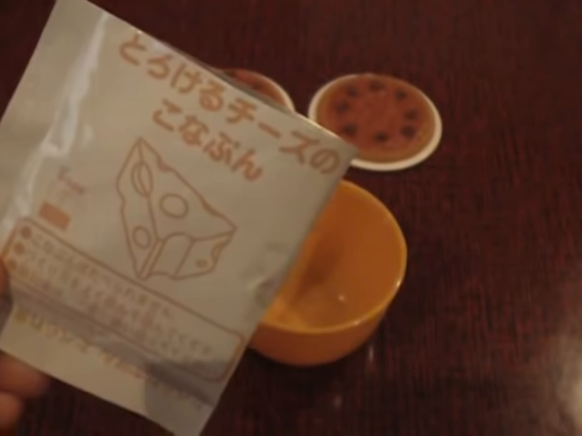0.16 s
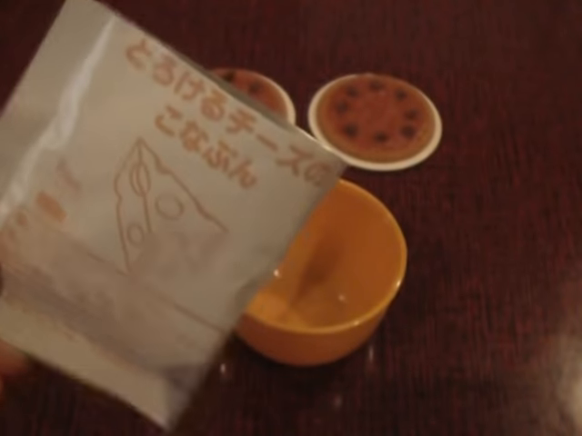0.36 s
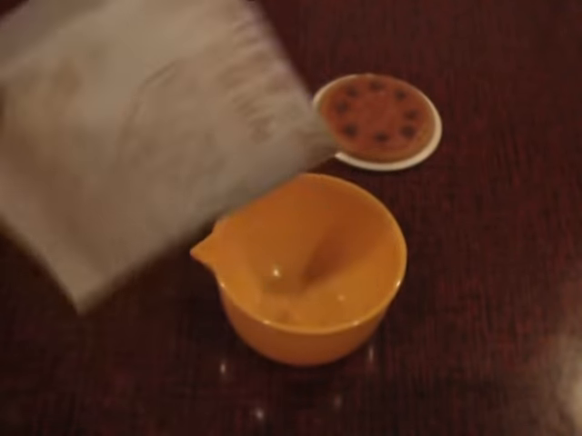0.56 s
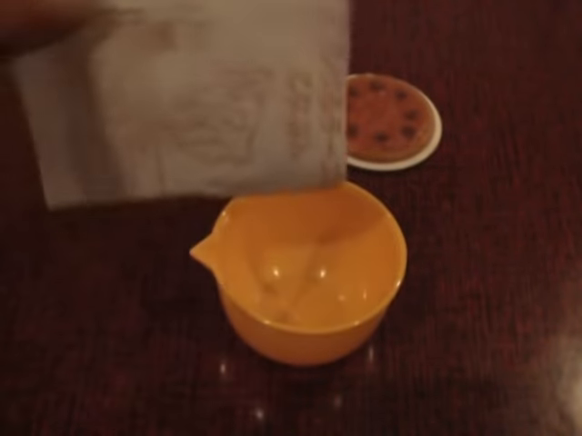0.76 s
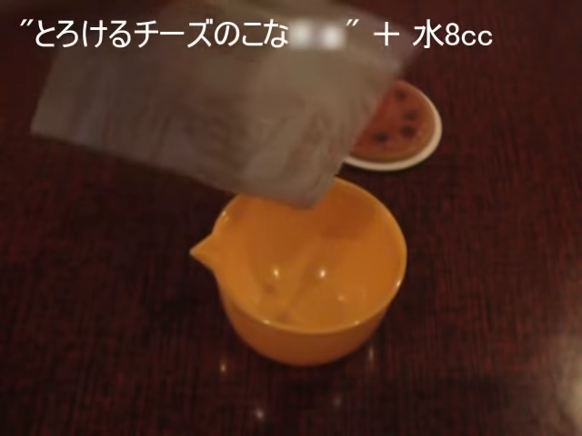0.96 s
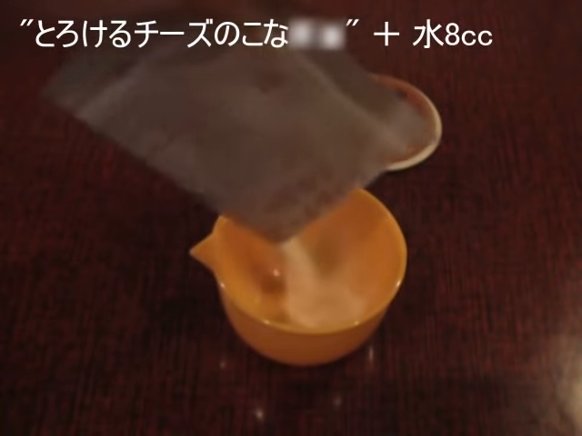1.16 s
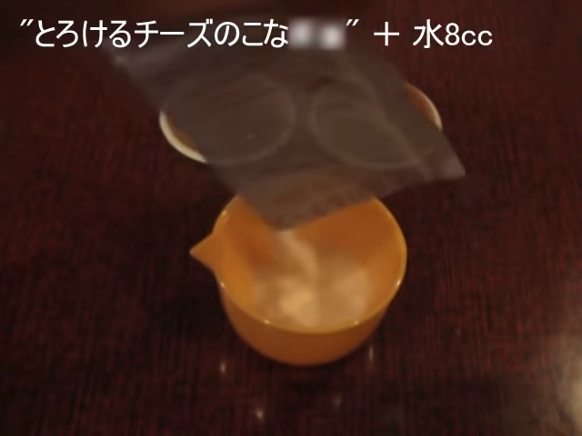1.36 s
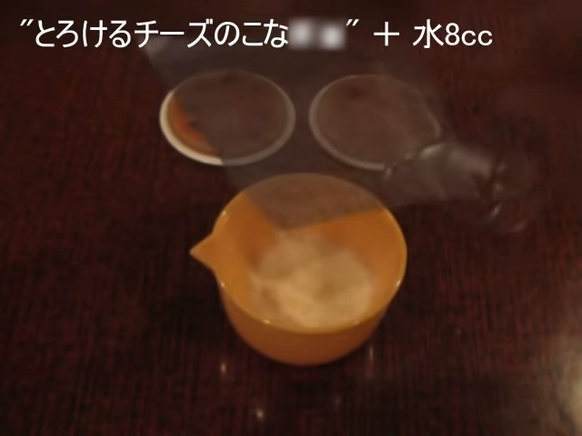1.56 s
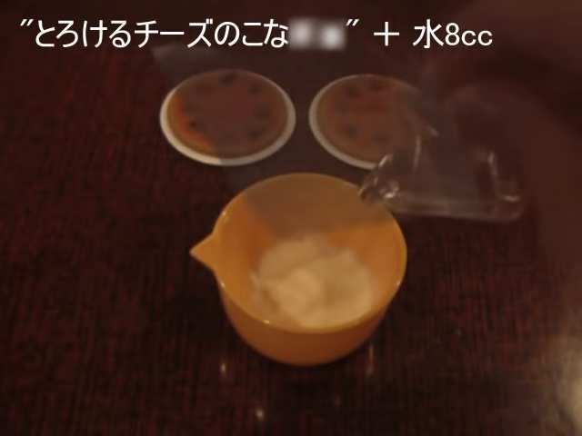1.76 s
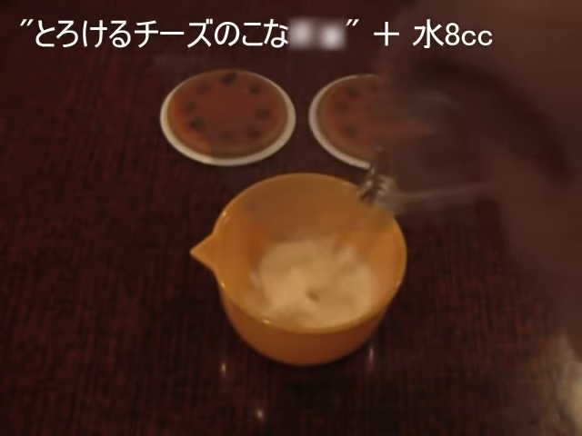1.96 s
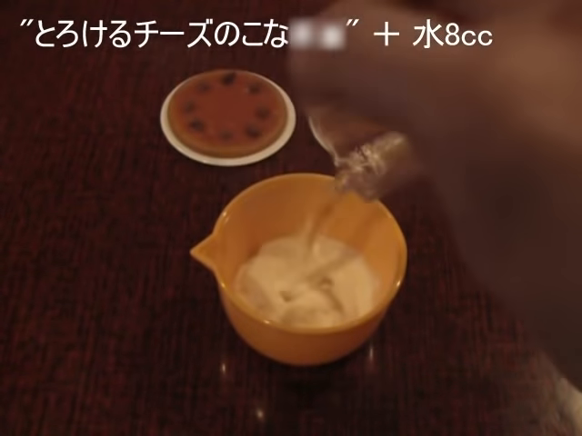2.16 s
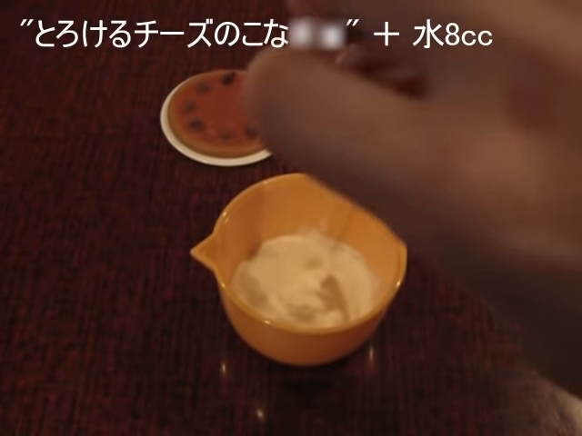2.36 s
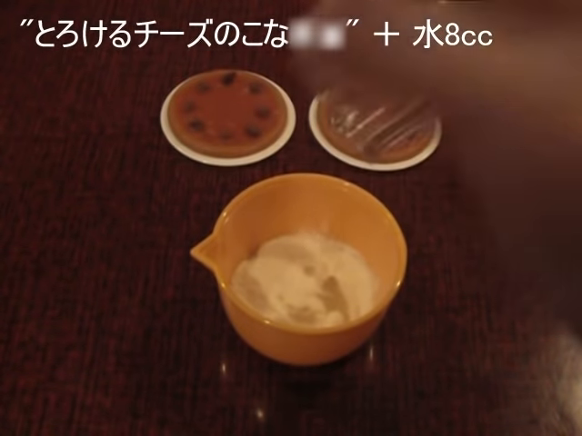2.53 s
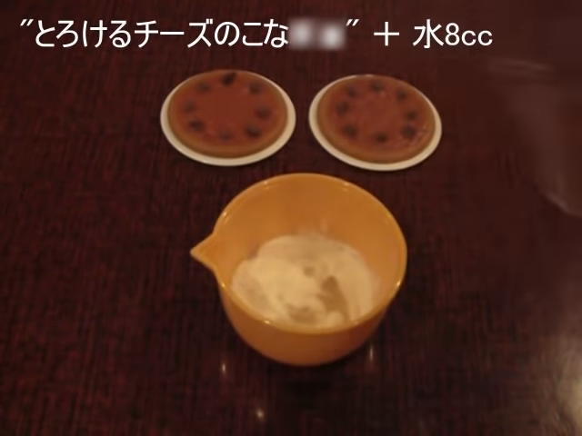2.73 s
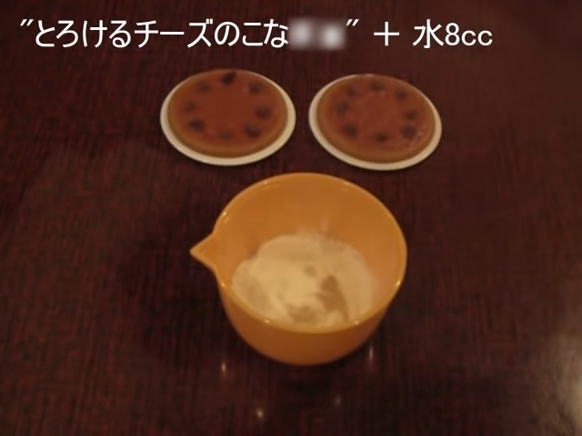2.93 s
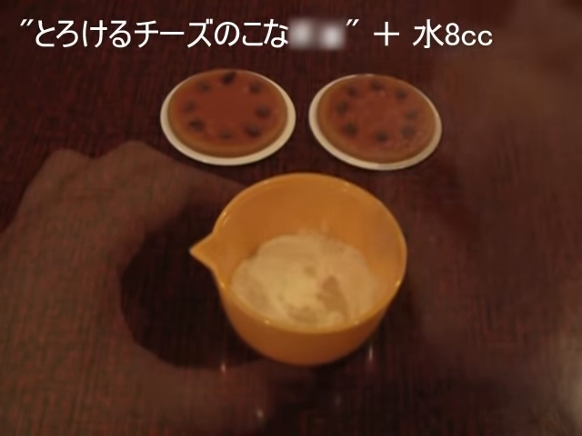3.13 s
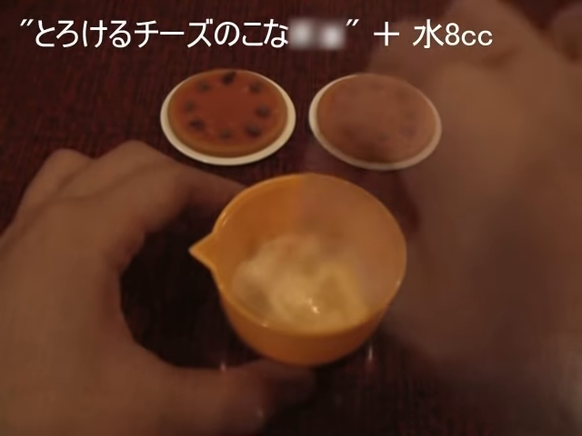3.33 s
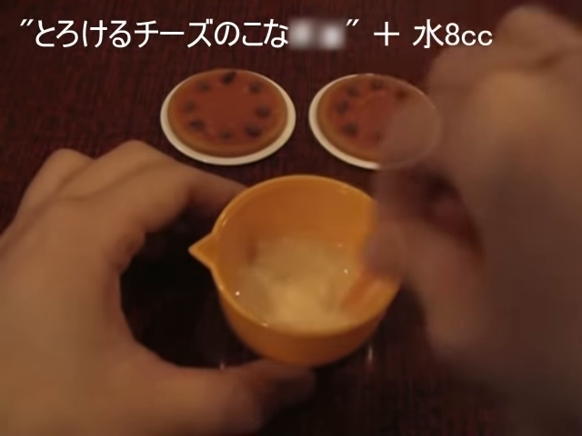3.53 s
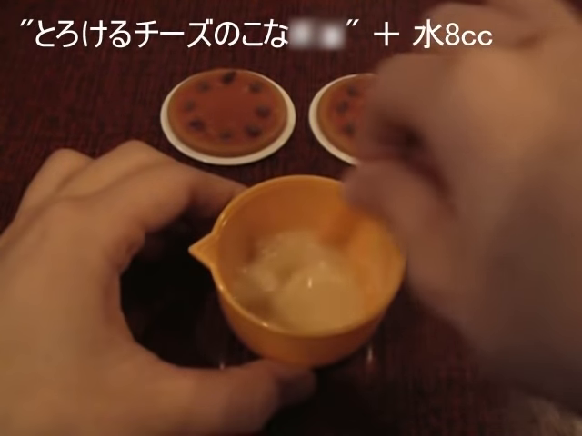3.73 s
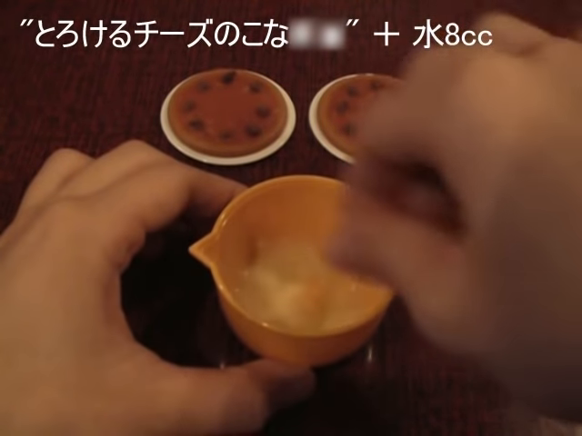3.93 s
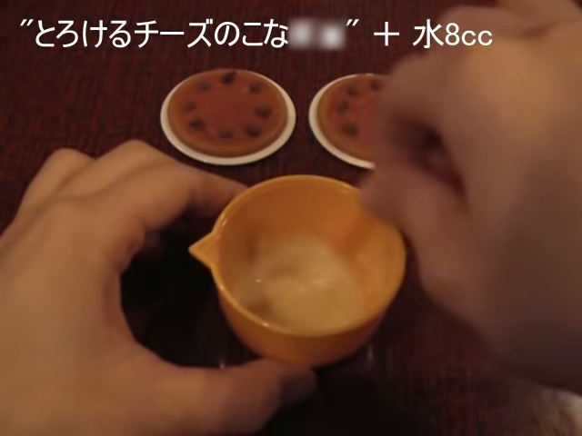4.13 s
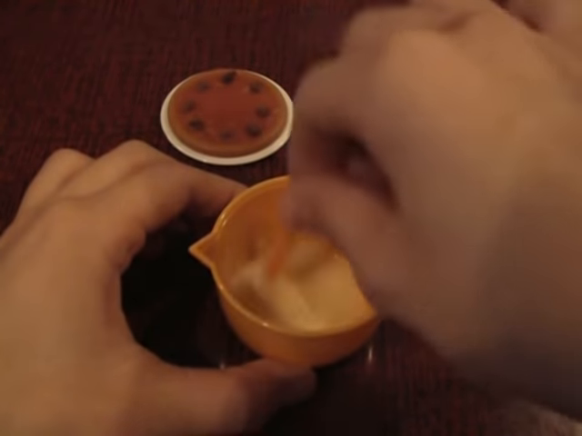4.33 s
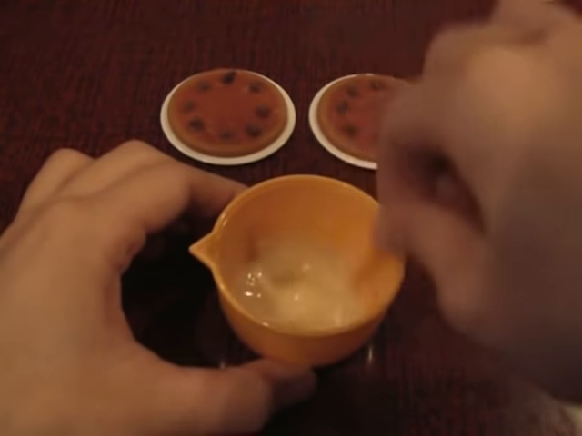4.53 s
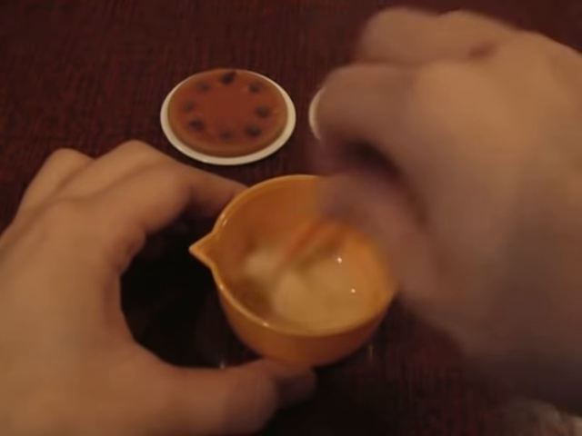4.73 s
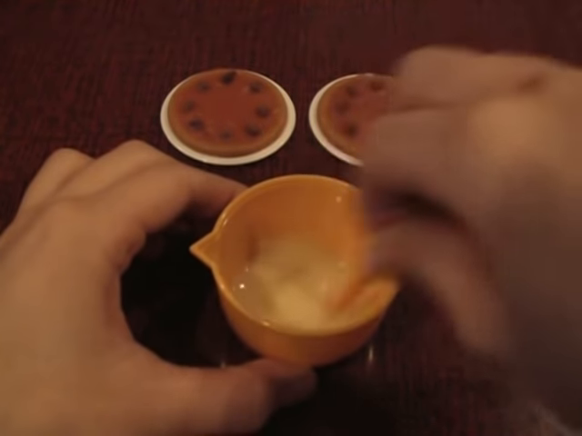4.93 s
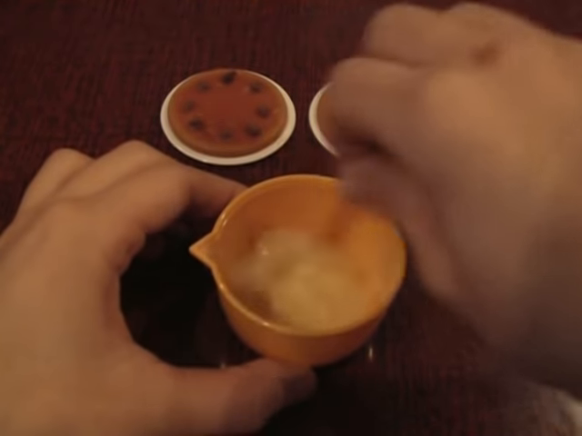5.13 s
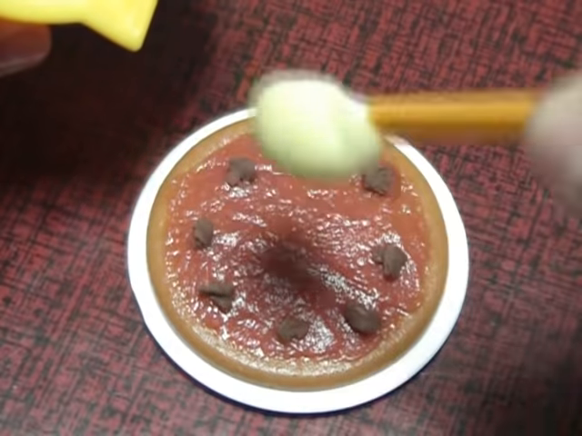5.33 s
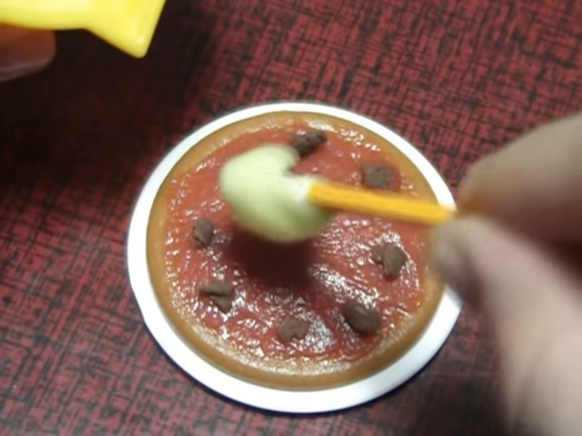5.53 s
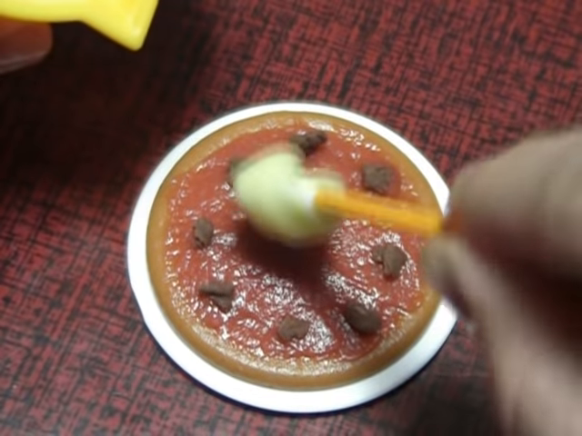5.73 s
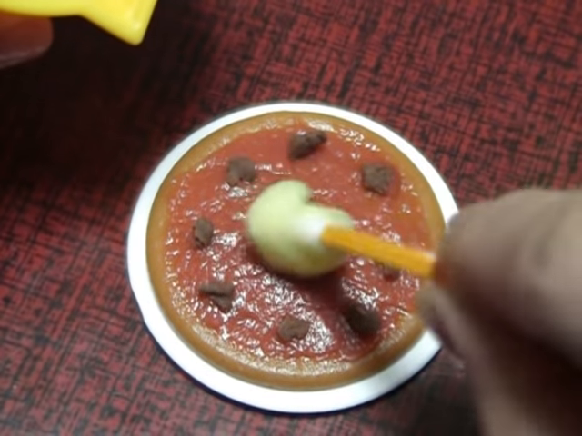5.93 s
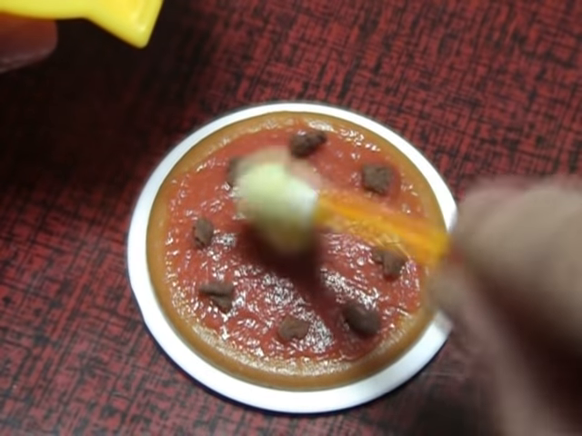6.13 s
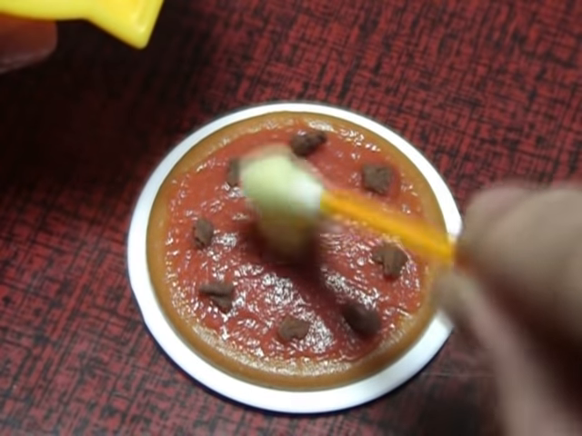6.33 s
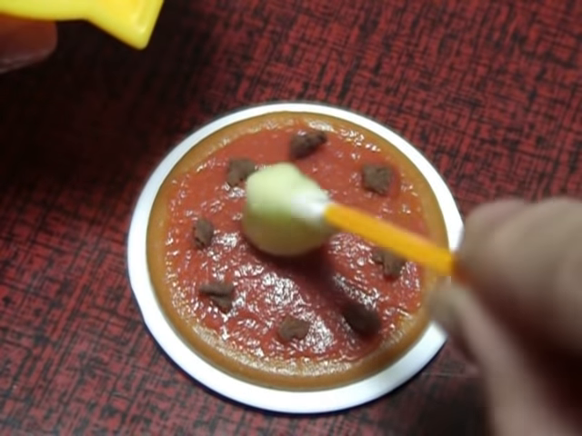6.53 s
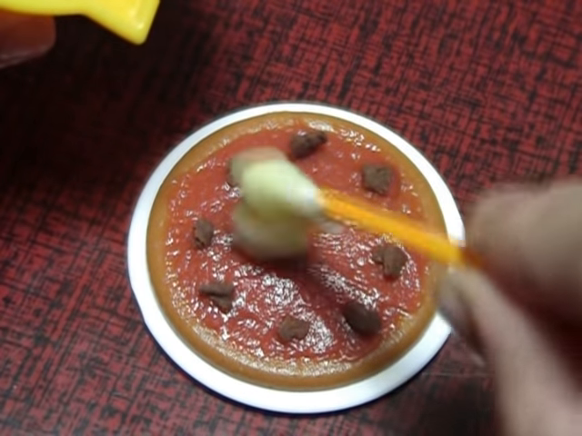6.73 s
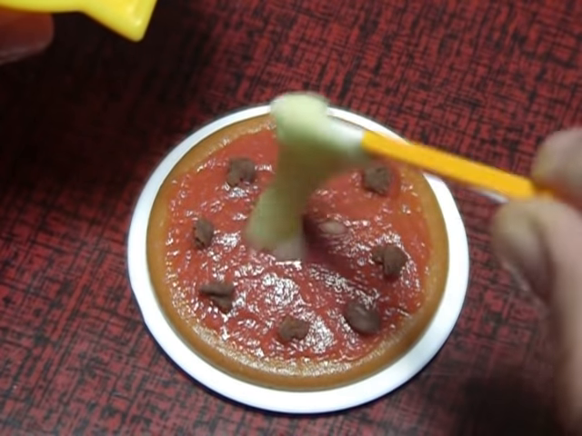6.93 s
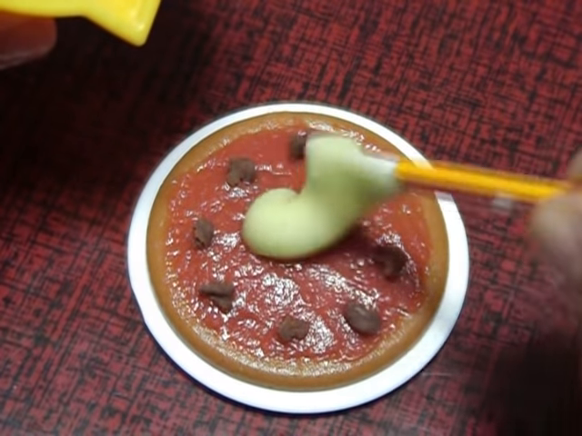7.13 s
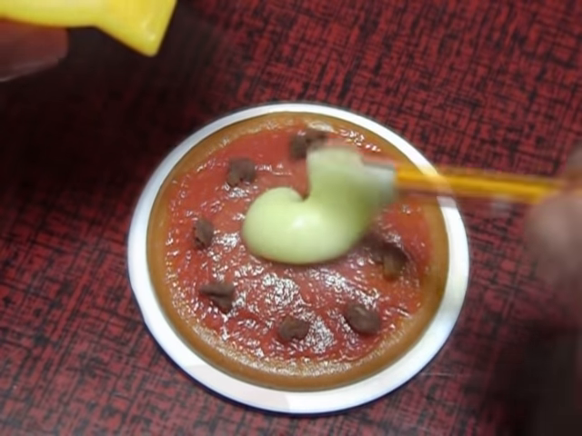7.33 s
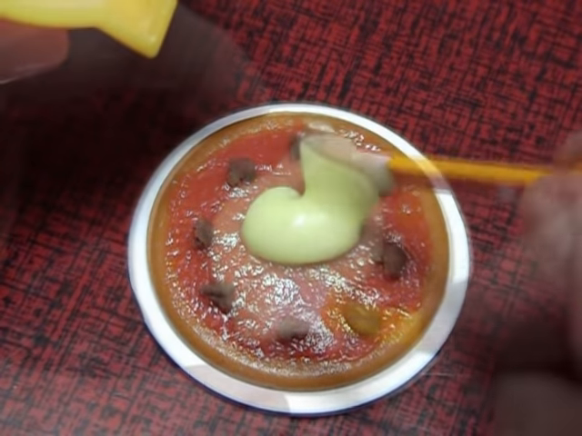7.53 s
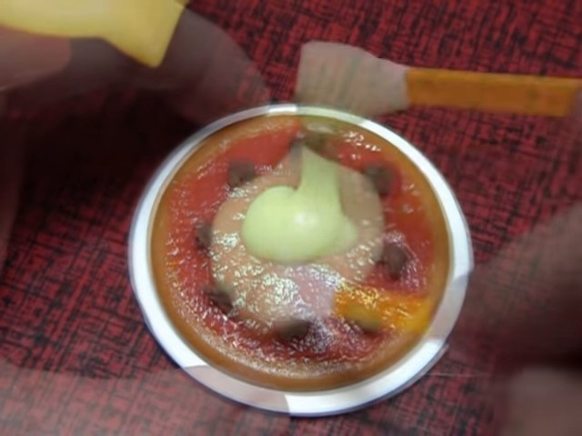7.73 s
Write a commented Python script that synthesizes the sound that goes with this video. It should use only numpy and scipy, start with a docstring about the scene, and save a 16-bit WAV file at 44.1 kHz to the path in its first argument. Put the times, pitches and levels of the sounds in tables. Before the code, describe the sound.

A small fan whines faintly over low room noise throughout, and all the action is close to the microphone. At about 0.5 seconds a foil packet crinkles and bumps twice against a small plastic cup, softly thudding the table. From 0.9 to 2 seconds powder slides out with a light hiss, surging with each shake among small foil snaps. The cup is tapped at 2 seconds, and at 2.4 a plastic scoop clatters briefly and brightly onto the table. From about 3 to 5.2 seconds a spoon stirs the wet, gritty mix, with irregular scrapes, plastic knocks and little squelches that grow louder. The background then turns slightly duller, a hand rubs softly, and at 5.5 seconds comes a dull, heavy table thump, the loudest sound. Until about 7.8 seconds paste is spread with very faint squishing and a few tiny sticky clicks.

```python
"""A table in a quiet room. Powder, shaken from a crinkling foil packet, slides into a small plastic cup.
A plastic water scoop clatters down. A plastic spoon stirs the gritty mix: slipping grit and knocks ring
the cup, air pockets squelch. The table thumps, then the paste is spread with tiny sticky clicks.
A small fan whines faintly over the room noise throughout."""
import sys
import numpy as np
from scipy import signal
from scipy.fft import rfft, irfft
from scipy.io import wavfile

SR = 44100
rng = np.random.default_rng(int(sys.argv[2]) if len(sys.argv) > 2 else 0)


def wav_record(signal):
    """Record a signal, one row per channel, as 16-bit PCM in the file named by sys.argv[1]."""
    frames = np.transpose(np.atleast_2d(signal))
    bounded = np.clip(frames, -1, 1)
    # unit amplitude maps onto the largest positive 16-bit level
    quanta = np.round(bounded * 32767).astype(np.int16)
    wavfile.write(sys.argv[1], SR, quanta)


N = 343344
T = np.arange(N) / SR

# modes of the filled cup: f/Hz, width/Hz, gain/dB
CUP_MODES = [(289, 47, -5.5), (417, 40, -13.5), (694, 87, -3), (862, 64, 4), (942, 54, -2.5),
             (1182, 113, -8.5), (1532, 130, -6), (1724, 80, -4), (1867, 93, -2), (2016, 127, -2.5),
             (2280, 82, -6.5), (2444, 110, -2), (2550, 68, -6.5), (3040, 150, -4), (3594, 230, -4),
             (3970, 140, -8), (4640, 210, -6), (5830, 3000, -18), (7300, 380, -6), (8320, 420, -1),
             (9150, 440, -6.5), (11100, 2400, -19.5)]


def stirring(stick_s=.009, stick_db=-10, hollow_db=5, hollow_oct=1.1, wobble_oct=.19):
    """Grit slips under the spoon and rings the cup, most near the pitch of the hollow in the wet mix."""
    # spoon pushes: t/s, length/s, level/dB, treble offset/dB, hollow f/Hz
    strokes = [(2.92, 0.079, -64.5, 1, 2140), (3.139, 0.05, -61, -2, 2610), (3.225, 0.062, -57, -3, 2670),
               (3.265, 0.075, -54, 2, 1880), (3.35, 0.13, -58.5, -1, 1080), (3.494, 0.061, -55, 8, 3150),
               (3.58, 0.13, -57.5, 3, 1600), (3.835, 0.036, -45.5, -2.5, 3120),
               (3.9, 0.064, -60.5, 0.5, 1310), (3.971, 0.084, -54.5, 2, 1900),
               (4.165, 0.057, -55, -2.5, 1720), (4.225, 0.17, -53.5, 1, 2460),
               (4.462, 0.053, -53.5, -1, 1440), (4.531, 0.14, -51.5, 2, 3170),
               (4.674, 0.04, -47, -0.5, 2160), (4.715, 0.04, -58.5, -3, 2300),
               (4.834, 0.037, -51, -0.5, 1130), (4.89, 0.031, -49, 2.5, 3170), (4.971, 0.089, -56, 6, 1400),
               (5.02, 0.052, -45, -4.5, 2960), (5.084, 0.086, -49.5, -1.5, 1190)]
    # spoon sticks briefly: t/s
    sticks = [3.398, 3.957, 4.878, 4.958]
    body, treble = gestures([row[:4] for row in strokes], attack_s=.0035, sag_db=1, release_s=.013)
    moving = amp(stick_db * sum(np.exp(-((T - s) / stick_s) ** 2) for s in sticks))
    hollow_hz = np.interp(T, *np.transpose([(s + length / 2, hz) for s, length, _, _, hz in strokes]))
    judder = amp(2.5 * wander(per_s=220))
    slips = grains(per_s=7000, spread_db=4) * judder
    scrape, hop = np.zeros(N), SR // 40
    window = np.pad(np.hanning(2 * hop), (0, hop))
    start_s, end_s = strokes[0][0], sum(strokes[-1][:2])
    for i in range(round(start_s * SR), round(end_s * SR), hop):
        modes = [(hz, width_hz, db + hollow_db * nearness(hz, hollow_hz[i + hop], hollow_oct))
                 for hz, width_hz, db in CUP_MODES]
        force = slips[i:i + len(window)] * window
        add(scrape, i / SR, unit(ring(force, modes, detune=.012, spread_db=3.5)))
    duty_gain = np.sqrt((end_s - start_s) / T[-1])  # rms 1 while stirring
    rasp = duty_gain * unit(band(scrape, (560, 4600)))
    grit = duty_gain * unit(band(scrape, (6000, 21000)))
    wet = unit(resonate(slips, hollow_hz * 2 ** (wobble_oct * wander(per_s=50)), width_hz=900))
    drag = unit(band(rng.standard_normal(N) * judder, (90, 330), order=2))  # cup rocks on the table
    spit = unit(band(grains(per_s=700, spread_db=3.2), (2800, 10000), order=2))  # wet films snap
    low = amp(-2) * rasp + amp(-8) * wet + amp(-15) * drag
    high = amp(-3.5) * grit + amp(-6) * spit
    return moving * (body * low + treble * high)


def knocking(bass_db=-2.5, pocket_db=-.5, snap=6, rise_per_s=6, bubble_decay_s=.0081):
    """The spoon ticks on the cup and squeezes air pockets that squelch, rising in pitch."""
    # spoon knocks: t/s, contact/s, cup/dB, treble/dB, pocket f/Hz, pocket/dB
    hits = [(3.0854, 0.015, -57.5, -58.5, 1380, -55.5), (3.1415, .001, -60, -52, 4500, -55.5),
            (3.169, 0.0035, -57, -55, 3610, -53), (3.1934, 0.003, -51, -45, 1900, -50.5),
            (3.2645, 0.0045, -43.5, -48, 1750, -43.5), (3.289, 0.0069, -54, -48, 1600, -48),
            (3.306, .002, -49, -47, 2000, -47), (3.327, 0.0028, -51, -46, 1930, -48),
            (3.335, 0.0052, -47.5, -41.5, 1500, -50.5), (3.405, 0.0009, -60, -52, 11600, -41),
            (3.4161, 0.0072, -48.5, -53, 835, -50), (3.432, 0.0022, -52, -48, 2100, -55),
            (3.451, 0.0019, -51, -42, 1810, -52), (3.494, 0.0007, -43.5, -36, 1860, -45),
            (3.511, 0.004, -54, -54, 2150, -41), (3.526, .002, -48, -40, 3500, -46),
            (3.552, .002, -53, -40, 9500, -46), (3.5679, 0.0012, -49, -35.5, 800, -55),
            (3.636, 0.00088, -51, -35, 2240, -45.5), (3.6747, 0.0021, -41, -50, 1630, -40),
            (3.696, 0.0011, -56, -54, 10500, -50), (3.8322, 0.0018, -47.5, -50, 2170, -46),
            (3.8569, 0.0066, -39, -40, 1940, -42), (3.8649, .0015, -42, -35, 890, -48),
            (3.95, .0005, -56, -51, 4470, -47), (3.9614, 0.0016, -46, -42.5, 2030, -38.5),
            (3.976, 0.0072, -47, -46, 2000, -44), (4.0078, 0.0086, -49.5, -44.5, 1950, -51),
            (4.1566, 0.0017, -51, -60, 1320, -43.5), (4.1952, 0.00089, -36.5, -61, 2020, -37.5),
            (4.2176, 0.0042, -40.5, -34.5, 872, -53), (4.2894, 0.0078, -53, -49, 2070, -44.5),
            (4.3064, 0.0051, -47.5, -42, 2380, -51), (4.3486, 0.0019, -43.5, -40, 2420, -53),
            (4.3555, .001, -52, -42, 3000, -50), (4.3765, 0.0045, -42.5, -40, 1040, -50.5),
            (4.4025, .001, -53, -47, 4000, -58), (4.452, 0.0028, -43.5, -33.5, 1190, -40.5),
            (4.4588, 0.0018, -40.5, -41, 1536, -39.5), (4.488, 0.0018, -53, -53, 1630, -46),
            (4.5062, .003, -48, -49, 1590, -47), (4.5785, 0.0031, -54, -43.5, 4000, -44),
            (4.6748, 0.0039, -35.5, -32, 1880, -33.5), (4.682, 0.0025, -34.5, -34, 2180, -32.5),
            (4.687, 0.0092, -51, -34.5, 2130, -37.5), (4.7307, 0.0032, -54, -44, 1820, -40.5),
            (4.7528, .0015, -58, -46, 9500, -46), (4.8333, 0.0011, -44, -42.5, 1570, -38),
            (4.862, 0.0035, -46.5, -47, 1400, -42), (4.9072, .0018, -35, -38, 2140, -38),
            (4.9659, 0.0025, -39, -29, 4600, -43), (5.0184, 0.0062, -42, -39.5, 2080, -40.5),
            (5.027, .002, -44, -35.5, 2300, -46), (5.0553, 0.0019, -46, -34, 3230, -45),
            (5.069, 0.0022, -49, -44, 3000, -51), (5.0985, .001, -48, -43, 4000, -57),
            (5.1275, 0.003, -41, -37.5, 1340, -39), (5.138, 0.0038, -46, -43, 885, -47),
            (5.1625, 0.00092, -54, -44, 1700, -50)]
    # bubbles bursting in the mix: t/s, f/Hz, level/dB
    bubbles = [(3.675, 720, -43), (4.908, 660, -35)]
    ticks = [(s, contact_s, db + bass_db, db, treble_db) for s, contact_s, db, treble_db, _, _ in hits]
    out = contacts(ticks, CUP_MODES, gain_db=-2.5, snap=4.6, detune=.0051, spread_db=2,
                   scatter=.13, scatter_s=.0027)
    t = np.arange(SR // 16) / SR
    for s, contact_s, _, _, hz, db in hits:
        slips = rng.standard_normal(len(t)) * np.exp(-(t / (contact_s + .001)) ** 4)
        slips[0] += snap
        drive = unit(ring(slips, CUP_MODES)) + unit(slips)  # through the wall + direct
        squelch = resonate(drive, hz * (1 + rise_per_s * t), width_hz=.55 * hz)
        duty_gain = np.sqrt((contact_s + .004) / t[-1])
        add(out, s, amp(db + pocket_db) * unit(squelch) * duty_gain)
    for s, hz, db in bubbles:
        add(out, s, amp(db) * np.exp(-t / bubble_decay_s) * np.sin(2 * np.pi * hz * t))
    return out


def scoop_clatter(focus_oct=.19, rise_s=.0008):
    """The scoop clicks on the table and rings the wall modes each contact favours; close modes beat."""
    # bounces: t/s, contact/s, bass/dB, mid/dB, treble/dB, favoured f/Hz, ring/dB
    hits = [(2.3863, .0006, -68, -53, -51, 3500, -34), (2.3928, .0013, -54, -54, -31.5, 7700, -19),
            (2.4089, .0008, -58, -48, -49, 7700, -42), (2.4142, 0.00046, -46, -31.5, -29, 2950, -19.5),
            (2.4373, .0007, -58, -53, -52, 3100, -48), (2.4423, .0005, -66, -46, -38.5, 7700, -44),
            (2.4445, .0006, -60, -40.5, -41.5, 2950, -40), (2.4875, .001, -77, -57, -60, 3100, -55),
            (2.5015, .0005, -78, -66, -58, 7700, -60)]
    # broad scoop modes: f/Hz, width/Hz, gain/dB
    click_modes = [(880, 350, -12), (2050, 200, -2), (3100, 630, -6.5), (4200, 900, -7), (5700, 1000, -10),
                   (7560, 710, -2.5), (9100, 810, -6), (11000, 1600, -11)]
    # scoop wall: f/Hz, gain/dB, t60/s
    wall_modes = [(2796, -0.5, 0.025), (3120, 1, .03), (3490, 1, .026), (7580, 1, .006)]
    out = contacts([row[:5] for row in hits], click_modes, gain_db=-1.5, snap=7.8, detune=.02,
                   spread_db=0, scatter=.22, scatter_s=.0036)
    t = np.arange(SR // 8) / SR
    for s, *_, favoured_hz, ring_db in hits:
        for hz, db, t60_s in wall_modes:
            envelope = amp(ring_db + db - 60 * t / t60_s) * (1 - np.exp(-t / rise_s))
            add(out, s, nearness(hz, favoured_hz, focus_oct) * envelope * np.sin(2 * np.pi * hz * t))
    return out


def pouring(bright_db=4, clump_db=1.5):
    """Grains slide over the foil in small clumps: a running flow and a surge at each shake."""
    # flow as the packet tips and empties: t/s, level/dB
    flow_curve = [(.82, -77), (.9, -63), (1.04, -57), (1.18, -51.5), (1.32, -58), (1.42, -54.5),
                  (1.61, -65.5), (1.85, -67), (2.1, -78)]
    # slugs of powder: t/s, length/s, level/dB, treble offset/dB
    shakes = [(.548, 0.016, -55, 0.5), (1.18, 0.035, -47.5, 4.5), (1.225, 0.047, -67, 20),
              (1.5, 0.042, -48, 5.5), (1.666, 0.035, -50.5, 6.5), (1.82, 0.035, -74, 13.5),
              (1.94, 0.028, -73, 14)]
    # powder on foil: f/Hz, gain/dB
    spectrum = [(180, -40), (300, -12), (388, -26), (580, -28), (639, -37), (853, -11), (1090, -29),
                (1680, -20), (3140, -5), (4060, -6.5), (6000, -3), (7850, 4.5), (11900, -6.5), (14000, -7)]
    flow = amp(np.interp(T, *np.transpose(flow_curve), left=-200, right=-200))
    surge, treble_surge = gestures(shakes, attack_s=.0022, sag_db=-3, release_s=.021)
    powder = colour(grains(per_s=4500, spread_db=2), spectrum) * amp(clump_db * wander(per_s=120))
    rustle = np.hypot(flow, surge) * unit(band(powder, (500, 5500)))
    hiss = np.hypot(amp(bright_db) * flow, treble_surge) * unit(band(powder, (5500, 14000)))
    return rustle + hiss


def crinkling():
    """Creases of the packet snap and ring the foil."""
    # snaps: t/s, contact/s, bass/dB, mid/dB, treble/dB
    creases = [(.5345, 0.00053, -60, -60, -54), (.5496, 0.001, -55, -50, -53),
               (.5615, .0005, -72, -56, -54), (.886, 0.0021, -76, -54, -53), (.929, .0005, -78, -57, -58),
               (.9662, 0.008, -78, -52, -55), (1.0154, .0012, -75, -53, -52),
               (1.0398, 0.0016, -78, -47.5, -41), (1.0653, .0004, -77, -49.5, -52),
               (1.1557, .0009, -72, -52.5, -47.5), (1.2318, 0.0014, -56, -63, -41.5),
               (1.3615, 0.0078, -70, -55, -45), (1.503, 0.0046, -74, -55, -50),
               (1.669, 0.0031, -77, -52.5, -50), (1.779, .0006, -78, -61, -57),
               (2.052, .0005, -80, -65, -59)]
    # foil: f/Hz, width/Hz, gain/dB
    modes = [(3250, 750, -2), (5500, 1500, -2.5), (8000, 1600, 3), (10300, 1600, 2)]
    return contacts(creases, modes, gain_db=0, snap=7, detune=.081, spread_db=1,
                    scatter=.2, scatter_s=.0081)


def cup_bumps():
    """Packet, a lump of powder and scoop bump the cup before the stirring."""
    # bumps: t/s, contact/s, bass/dB, mid/dB, treble/dB
    bumps = [(.5802, 0.0074, -50.5, -56, -74), (.7425, 0.0032, -43, -41, -66),
             (1.1974, 0.01, -56, -55, -47), (1.9805, 0.0017, -59, -59, -62),
             (1.9838, 0.0019, -52, -43.5, -48.5)]
    # empty cup: f/Hz, width/Hz, gain/dB
    modes = [(440, 100, -1.5), (570, 120, -3), (790, 80, 2), (940, 80, 0), (1390, 120, 1.5),
             (1980, 210, 2.5), (2580, 240, -4), (3000, 280, -2), (3500, 350, -9), (4210, 350, -11),
             (5560, 1200, -14.5), (7800, 1000, -15), (9300, 1800, -2)]
    return contacts(bumps, modes, gain_db=.5, snap=10.7, detune=.009, spread_db=0,
                    scatter=.16, scatter_s=.012)


def table_thumps(rise_s=.0027):
    """Soft, heavy bumps ring the low modes of the table."""
    # bumps: t/s, level/dB
    bumps = [(0.5802, -46.5), (0.743, -47), (1.199, -52), (3.866, -64), (3.963, -41), (4.008, -44),
             (4.381, -48), (4.864, -44), (5.127, -38), (5.4585, -24)]
    # table top: f/Hz, gain/dB, t60/s
    modes = [(54.7, -16, .12), (97.3, -11.5, 0.16), (122, -10, .08), (162, -0.5, 0.042), (224, 4, 0.038),
             (299, -11, 0.11), (410, -1, 0.034), (530, -23, 0.085), (726, -23.5, 0.074), (1000, -19, .025)]
    out, t = np.zeros(N), np.arange(SR // 3) / SR
    blow = sum(amp(db - 60 * t / t60_s) * np.sin(2 * np.pi * hz * t) for hz, db, t60_s in modes)
    for s, db in bumps:
        add(out, s, amp(db) * blow * (1 - np.exp(-t / rise_s)))
    return band(out, (55, 2500), order=2)


def smearing(squish_db=1, crackle_db=-4):
    """Paste squishes under the spoon while tiny bubbles burst in it."""
    # one long smear, then short presses: t/s, length/s, level/dB, treble offset/dB
    presses = [(5.25, 2.4, -73, -2.5), (5.825, .03, -70.5, -7), (6.295, 0.03, -70.5, 9),
               (6.495, 0.014, -72, 10.5), (6.81, 0.048, -64.5, -10), (7.52, 0.028, -82, 2)]
    body, treble = gestures(presses, attack_s=.0067, sag_db=-4.5, release_s=.012)
    squish = unit(band(grains(per_s=4000, spread_db=4.5), (2800, 7000), order=1))
    crackle = unit(band(grains(per_s=170, spread_db=5.5), (7000, 12000), order=2))
    return amp(squish_db) * body * squish + amp(crackle_db) * treble * crackle


def paste_pops():
    """Sticky paste clicks as it parts."""
    # pops: t/s, contact/s, bass/dB, mid/dB, treble/dB
    pops = [(5.5312, 0.00023, -68.5, -60, -44), (5.5952, .0003, -80, -71.5, -62),
            (5.6236, 0.00041, -78, -77, -58), (6.305, 0.0008, -78, -69, -68),
            (7.2548, .0003, -77, -67, -65), (7.7682, 0.00048, -78.5, -80, -56)]
    # paste: f/Hz, width/Hz, gain/dB
    modes = [(800, 700, 1), (1960, 640, 12), (9150, 1200, 9.5), (10800, 1400, 25), (12900, 810, 21)]
    return contacts(pops, modes, gain_db=1, snap=9.3, detune=.03, spread_db=4,
                    scatter=.34, scatter_s=.0045)


def handling(rough_db=4.5):
    """Skin rubs softly and unevenly on the table and the spoon's handle."""
    # hand shifts: t/s, length/s, level/dB, treble offset/dB (unused)
    rubs = [(.12, .55, -70, 0), (2.74, 0.17, -65, 0), (5.28, 0.044, -55.5, 0), (5.8, .65, -70, 0)]
    pressure, _ = gestures(rubs, attack_s=.018, sag_db=-7.5, release_s=.03)
    friction = band(rng.standard_normal(N), (190, 560), order=2)
    return pressure * unit(friction * amp(rough_db * wander(per_s=45)))


def fan(level_db, drift=.0012, waver_db=.6):
    """A small fan whines, wavering in speed and level."""
    # fan tones: f/Hz, relative level/dB
    tones = [(420, -11.5), (603, -18), (840, -1), (1680, -21), (4237, -24.5), (10088, -39)]
    running_s = np.cumsum(1 + drift * wander(per_s=25)) / SR
    whine = np.sqrt(2) * sum(amp(db) * np.sin(2 * np.pi * hz * running_s) for hz, db in tones)
    return whine * amp(level_db + waver_db * wander(per_s=12))


def room_noise(early):
    """Low stereo noise, a little duller once `early` ends."""
    # stereo image: f/Hz, left-right correlation (negatives clipped to 0)
    correlation = [(50, 0.5), (150, -0.25), (370, 0), (900, 0.21), (2200, 0.1), (5500, 0), (13000, -0.55)]
    # early noise: f/Hz, gain/dB
    early_spectrum = [(20, -1), (60, -0.5), (130, 3.5), (250, 1.5), (420, 0.5), (650, -3), (900, 1.5),
                      (1400, -8), (2050, -5.5), (2600, -10), (4000, -9), (6500, -13.5), (10000, -16),
                      (12200, -23.5), (13200, -42)]
    # late noise: f/Hz, gain/dB
    late_spectrum = [(20, -4), (60, 1.5), (130, 3), (280, 0.5), (430, 0), (650, -5), (900, 1), (1400, -9),
                     (2600, -10.5), (4400, -16), (7000, -18), (10300, -18), (12200, -29), (13200, -46)]
    shared = np.clip(read(correlation, np.fft.rfftfreq(N, 1 / SR)), 0, 1)
    left, independent = rfft(rng.standard_normal((2, N)))
    right = shared * left + np.sqrt(1 - shared ** 2) * independent
    air = irfft(np.array([left, right]), N)
    return np.where(early, unit(colour(air, early_spectrum)), unit(colour(air, late_spectrum)))


def sizzle():
    """A thin sizzle of two narrow noise bands."""
    # bands: f/Hz, half-width/Hz, gain/dB
    peaks = [(2036, 110, -4), (5580, 115, -2.5)]
    return unit(sum(amp(db) * unit(band(rng.standard_normal(N), (hz - half_hz, hz + half_hz), order=2))
                    for hz, half_hz, db in peaks))


def background(shift_s=5.235, dip_s=1.84, dip_width_s=.28, fade_from_s=5.88, fade_db_per_s=1.5):
    """Noise and fan dip once; at shift_s the noise dulls, the fan grows and the sizzle stops."""
    early = T < shift_s
    dip = np.exp(-((T - dip_s) / dip_width_s) ** 2)
    fade_db = fade_db_per_s * np.maximum(T - fade_from_s, 0)
    noise = room_noise(early) * amp(-60 - 3 * dip - fade_db)
    whine = fan(level_db=-66 + 1.5 * (T >= shift_s) - 11 * dip)
    return placed(noise, right_db=1) + placed(whine, right_db=3) + amp(-72) * early * sizzle()


def treble_widening(x, gain_db=-5, lag_s=.0007, sway=.4):
    """A faint copy of the top treble, with a wavering delay on the left, widens the sound."""
    delay_s = lag_s * (1 + sway * wander(per_s=6))
    delayed = np.interp(T - delay_s, T, band(x, (10500, 16000), order=2))
    return np.array([amp(gain_db) * delayed, np.zeros(N)])


def room(x, gap_s=.003, echoes_per_s=3000):
    """Sparse reflections, different on each side, die away band by band."""
    # reverberation: f/Hz, t60/s
    decay = [(200, 0.83), (1000, 0.22), (3000, 0.18), (8000, 0.17), (13000, 0.14)]
    size = SR // 2
    taps = rng.standard_normal((2, size)) * (rng.random((2, size)) < echoes_per_s / SR)
    hz, t, spectra = signal.stft(taps * (T[:size] > gap_s), SR, nperseg=256)
    _, tail = signal.istft(spectra * amp(-60 * t / read(decay, hz)[:, None]), SR, nperseg=256)
    tail /= np.linalg.norm(tail, axis=1, keepdims=True)
    return signal.fftconvolve(x[None], tail, axes=1)[:, :N]


def contacts(rows, modes, gain_db, snap, detune, spread_db, scatter, scatter_s):
    """Each contact is a snap and a short run of slips that ring the object; near surfaces scatter it."""
    # bass, mid, treble: low f/Hz, high f/Hz
    bands_hz = [(200, 1400), (1400, 6000), (6000, 14000)]
    out, t = np.zeros(N), np.arange(SR // 16) / SR
    for s, contact_s, *band_db in rows:
        slips = rng.standard_normal(len(t)) * ((t < contact_s) + scatter * np.exp(-t / scatter_s))
        slips[0] += snap
        ringing = ring(slips, modes, detune, spread_db)
        hit = sum(amp(db) * unit(band(ringing, edges_hz)) for db, edges_hz in zip(band_db, bands_hz))
        duty_gain = np.sqrt((contact_s + .004) / t[-1])
        add(out, s, hit * duty_gain)
    return amp(gain_db) * out


def gestures(rows, attack_s, sag_db, release_s):
    """Body and treble gains: each gesture rises, changes by sag_db while it lasts, then dies away."""
    body, treble = np.zeros((2, N))
    for s, length_s, db, bright_db in rows:
        t = np.arange(0, length_s + 10 * release_s, 1 / SR)
        held = np.minimum(t / attack_s, 1) * amp(db + sag_db * np.minimum(t / length_s, 1))
        shape = held * np.exp(-np.maximum(t - length_s, 0) / release_s)
        add(body, s, shape ** 2)
        add(treble, s, (amp(bright_db) * shape) ** 2)
    return np.sqrt(body), np.sqrt(treble)


def ring(force, modes, detune=0., spread_db=0.):
    """Drives damped modes; the point of contact varies their pitch and strength."""
    out = np.zeros(len(force))
    for (hz, width_hz, db), (pitch, strength, sign) in zip(modes, rng.standard_normal((len(modes), 3))):
        pole = np.exp((-np.pi * width_hz + 2j * np.pi * hz * (1 + detune * pitch)) / SR)
        mode = signal.lfilter([1 - abs(pole)], [1, -pole], force).imag
        out += np.sign(sign) * amp(db + spread_db * strength) * mode
    return out


def resonate(x, hz, width_hz):
    """Double-pole resonance that follows the curve hz."""
    carrier = np.exp(2j * np.pi * np.cumsum(hz) / SR)
    r = np.exp(-np.pi * width_hz / SR)
    return (carrier * signal.lfilter([(1 - r) ** 2], [1, -2 * r, r * r], x / carrier)).real


def grains(per_s, spread_db):
    """Random tiny clicks, a few much larger than the rest."""
    size = amp(spread_db * np.minimum(rng.exponential(1, N), 4))
    return unit(size * rng.choice([-1., 1.], N) * (rng.random(N) < per_s / SR))


def wander(per_s):
    """Smooth random curve, rms 1."""
    knots_s = np.arange(0, T[-1] + 1, 1 / per_s)
    return unit(np.interp(T, knots_s, rng.standard_normal(N)[:len(knots_s)]))


def nearness(hz, centre_hz, width_oct):
    """Bell curve over pitch, 1 at the centre."""
    return np.exp(-(np.log2(hz / centre_hz) / width_oct) ** 2)


def band(x, edges_hz, order=3):
    """Causal band-pass."""
    return signal.sosfilt(signal.butter(order, edges_hz, "bandpass", fs=SR, output="sos"), x)


def colour(x, points):
    """Filters by a dB spectrum."""
    return irfft(rfft(x) * amp(read(points, np.fft.rfftfreq(N, 1 / SR))), N)


def read(points, hz):
    """Interpolates on a log-frequency axis."""
    points_hz, values = np.transpose(points)
    return np.interp(np.log(hz + 1), np.log(points_hz), values)


def amp(db):
    """Decibels to gain."""
    return 10 ** (np.asarray(db) / 20)


def unit(x):
    """Scales to rms 1."""
    return x / np.sqrt(np.mean(x ** 2) + 1e-20)


def add(mix, start_s, sound):
    """Mixes a sound in at start_s."""
    part = mix[round(start_s * SR):][:len(sound)]
    part += sound[:len(part)]


def placed(x, right_db):
    """Pans to the right."""
    return x * amp([[-right_db / 2], [right_db / 2]])


def scene(packet_room_db=-11, cup_room_db=-15, scoop_room_db=-9):
    """Packet, cup and scoop, close by and a little to the right."""
    # balance of cup and scoop: f/Hz, left minus right/dB
    balance = [(60, 6), (130, -2), (280, -3), (620, -2.5), (1340, 0), (2910, 0), (6310, -3), (13700, -4.5)]
    packet = pouring() + crinkling()
    scoop = scoop_clatter()
    cup = stirring() + knocking() + cup_bumps() + smearing() + paste_pops()
    near = placed(packet, right_db=2) + placed(table_thumps() + handling(), right_db=4)
    for channel, side in enumerate((1, -1)):
        near[channel] += colour(cup + scoop, [(hz, side * db / 2) for hz, db in balance])
    near += treble_widening(packet + cup + scoop)
    reverb = room(amp(packet_room_db) * packet + amp(cup_room_db) * cup + amp(scoop_room_db) * scoop)
    return near + reverb + background()


def record(dry, cutoff_hz=13900):
    """The top treble rolls off, then cuts out."""
    dull = colour(dry, [(10500, .5), (12000, -3.5), (13500, -13.5)])
    lowpass = signal.firwin(301, cutoff_hz, window=("kaiser", 8), fs=SR)
    return signal.oaconvolve(dull, lowpass[None], "same")


dry = scene()
out = record(dry)
wav_record(out)
```